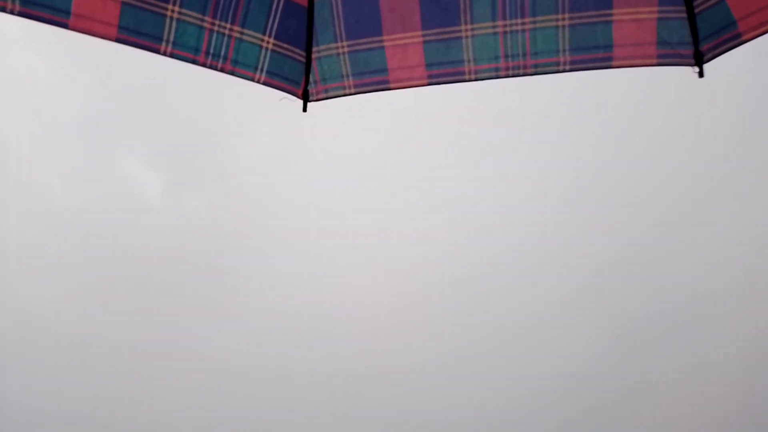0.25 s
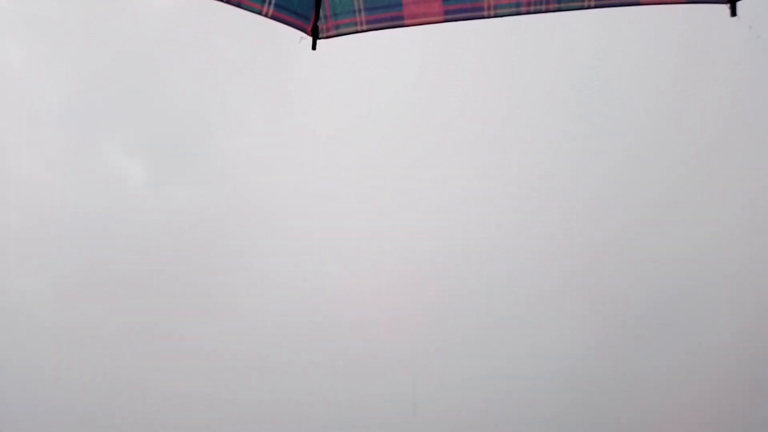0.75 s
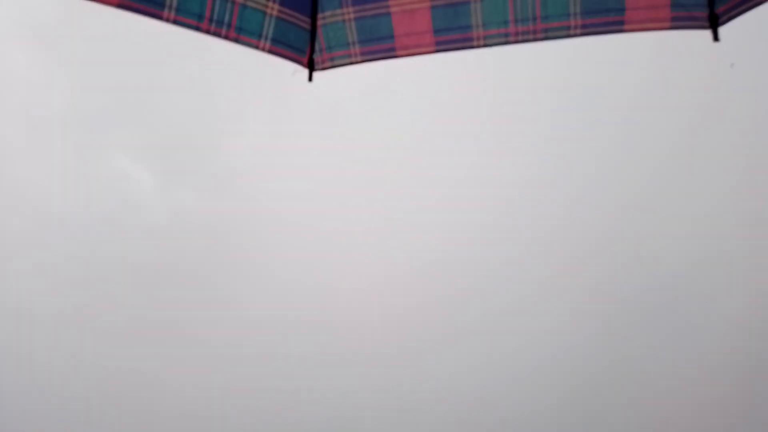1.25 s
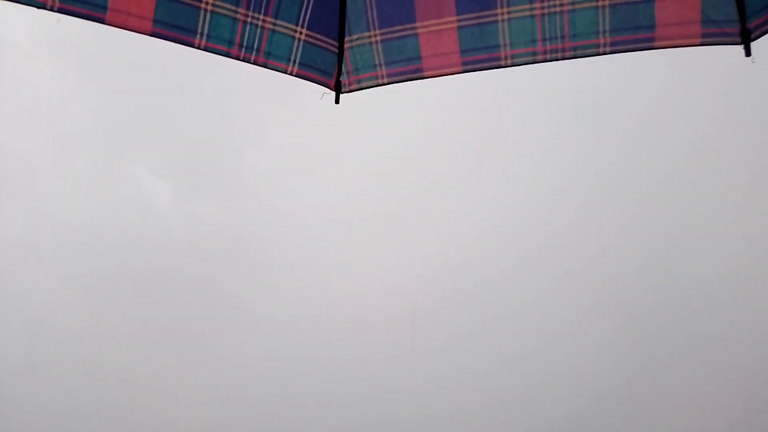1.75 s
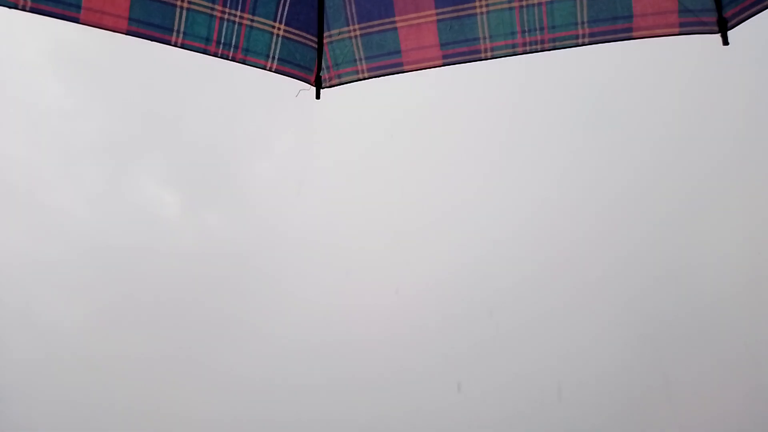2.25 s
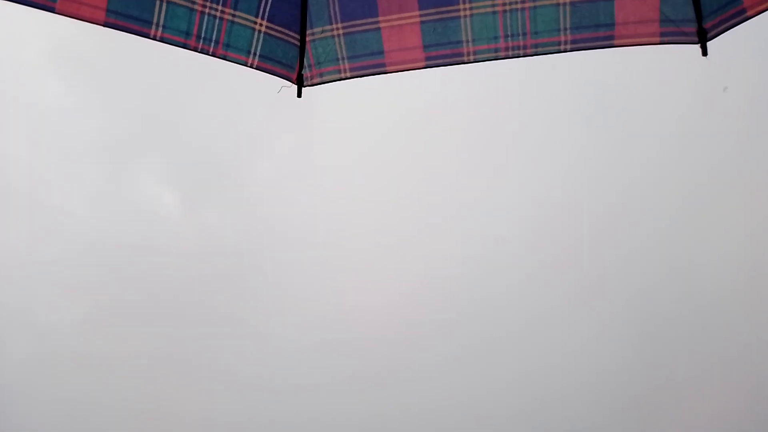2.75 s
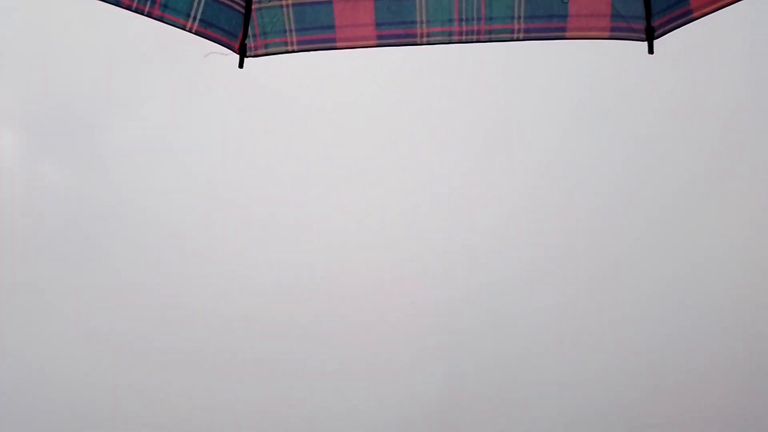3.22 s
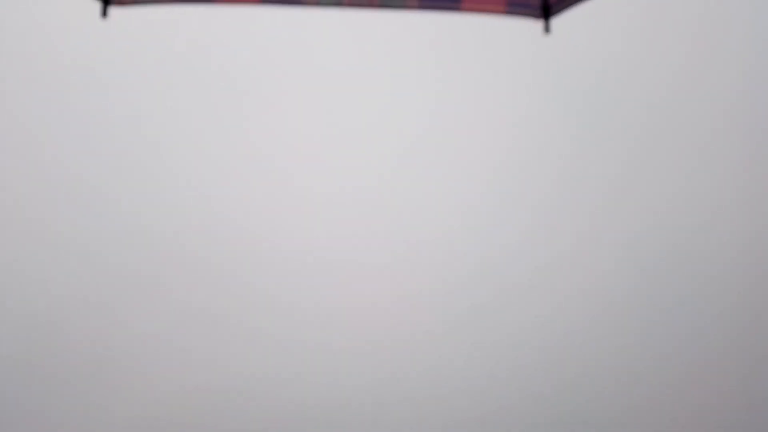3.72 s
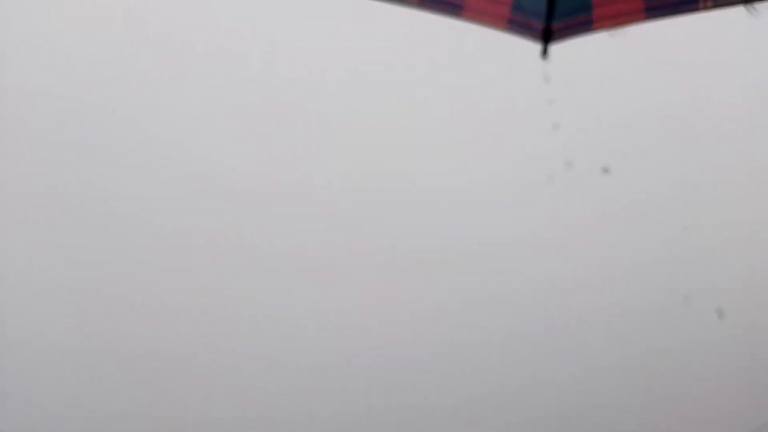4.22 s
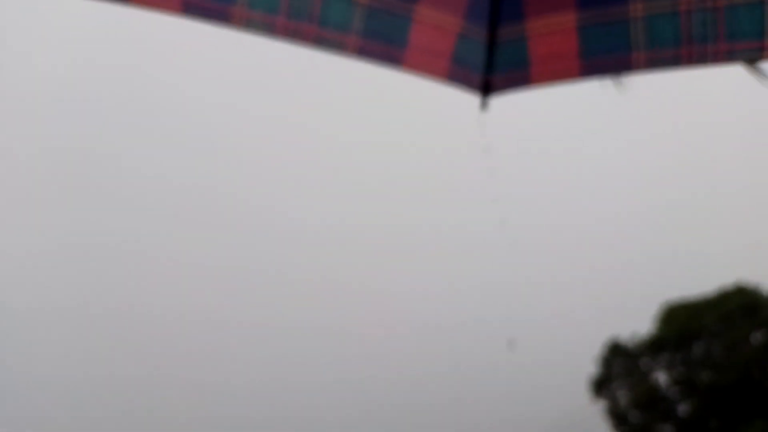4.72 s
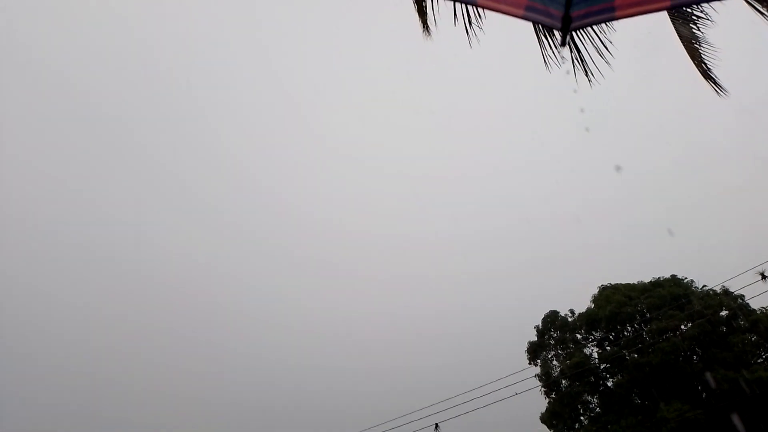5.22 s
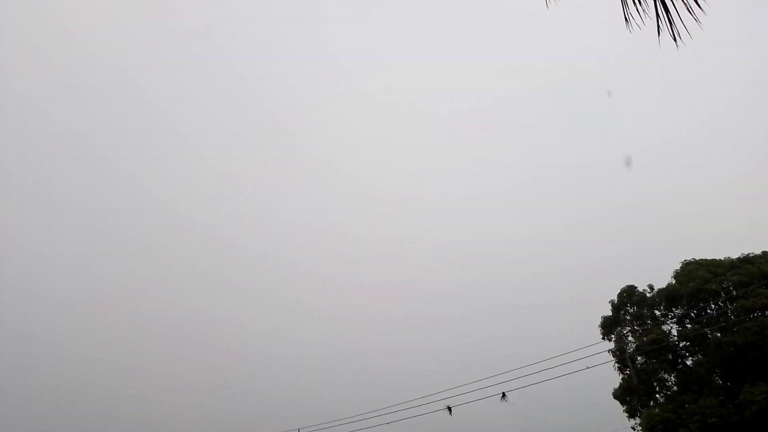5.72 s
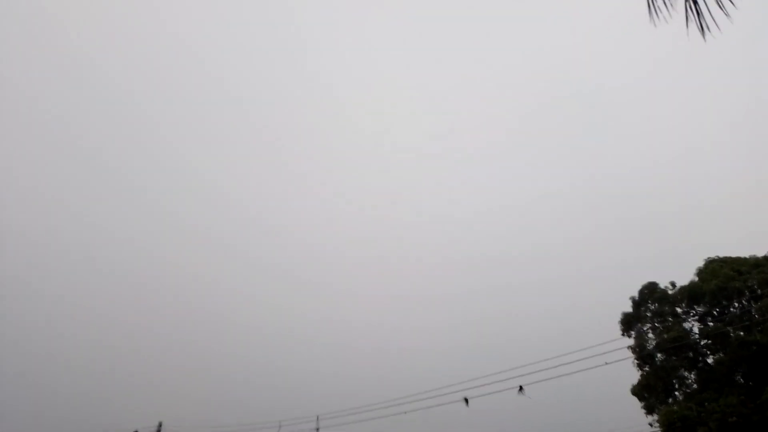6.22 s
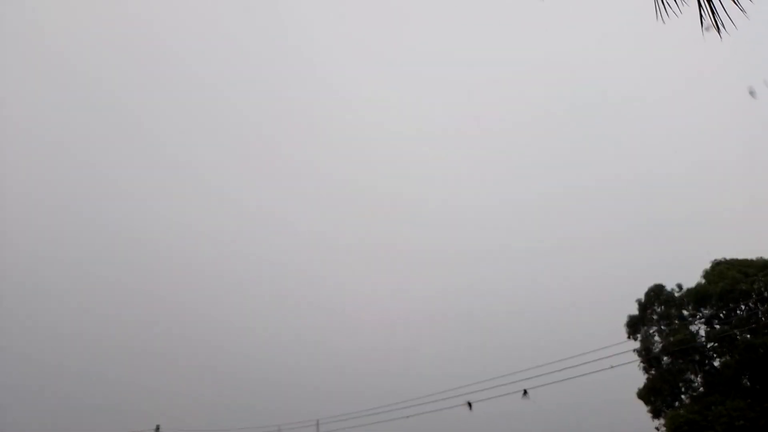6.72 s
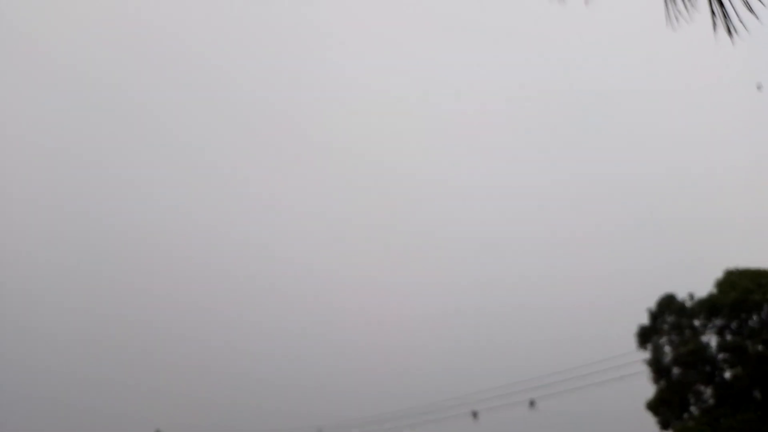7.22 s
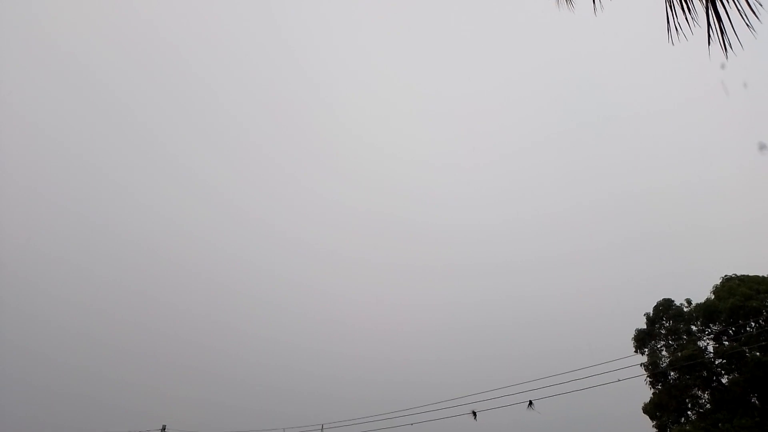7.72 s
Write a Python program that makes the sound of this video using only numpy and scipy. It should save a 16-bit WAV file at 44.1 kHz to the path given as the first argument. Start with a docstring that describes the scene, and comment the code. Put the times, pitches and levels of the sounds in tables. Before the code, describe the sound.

Under a cloth umbrella in open air, a continuous sizzling rain hiss surrounds quick patter and larger, low-pitched drop hits. A few sharp splashes snap close to the microphone. After a sparse early stretch the thumps grow thicker and stronger around three to four seconds, then continue in uneven bunches to the end. Close stereo phone sound, with bright, processed highs and only very faint wind rumble.

```python
"""Drops thump and crack on the taut cloth of an umbrella over a steady hiss: heavy rain around a two-microphone phone.
Each drop is a damped swing, a panel ring and a noise burst; near spray is random clicks, far rain is banded noise,
wind on the ports is low-band noise. The left port also has a hollow ring of varying strength.
Each port rings at its own high pitch and turns the hiss into two bright bands, whose edges the phone's
noise suppressor sharpens."""
import sys
import numpy as np
from scipy import signal
from scipy.io import wavfile
from scipy.ndimage import uniform_filter1d

SR = 44100
rng = np.random.default_rng(int(sys.argv[2]) if len(sys.argv) > 2 else 0)


def pcm_store(signal):
    """Save signal as 16-bit PCM."""
    levels = np.round(np.clip(np.atleast_2d(signal), -1, 1) * 32767)
    wavfile.write(sys.argv[1], SR, levels.astype(np.int16).T)


N = 351036

# big drops on the cloth: (time [s], dent level before pan [dB], panel pitch [Hz])
BIG_DROPS = [(0.0178, -18.5, 810), (0.0503, -17, 780), (0.162, -16, 714), (0.328, -21, 950),
             (0.3923, -19, 1000), (0.5147, -19, 700), (0.5315, -18, 1000), (0.573, -15.0, 980),
             (0.5883, -21, 1010), (1.2087, -25, 1010), (1.4034, -21, 880), (1.6801, -13.5, 550),
             (1.727, -18, 825), (1.8727, -14.0, 890), (1.8816, -11.5, 500), (2.0026, -20, 950),
             (2.0348, -14.5, 780), (2.2598, -20, 930), (2.3618, -16, 920), (2.3763, -16, 840),
             (2.4273, -15.5, 700), (2.5081, -17.0, 1110), (2.574, -20, 940), (2.6068, -12.5, 430),
             (2.6248, -10, 500), (2.8114, -16.5, 590), (2.8274, -15.5, 520), (2.8608, -15.5, 736),
             (2.8866, -16, 520), (2.9286, -13, 550), (2.9348, -16, 590), (2.9515, -13.0, 540),
             (2.9587, -12, 640), (2.9747, -19.0, 990), (2.9915, -16, 780), (3.005, -17.0, 540),
             (3.0112, -15, 720), (3.0406, -16, 750), (3.1573, -20, 680), (3.1723, -16, 680),
             (3.2075, -16, 674), (3.26, -15.0, 780), (3.3578, -14.5, 1070), (3.3973, -21, 1040),
             (3.4559, -15.0, 660), (3.47, -8.5, 764), (3.5216, -16, 567), (3.5316, -15.5, 590),
             (3.542, -16, 980), (3.6182, -15.5, 670), (3.6242, -19, 770), (3.6578, -16.0, 660),
             (3.708, -13, 450), (3.7691, -16, 710), (3.899, -11.5, 460), (3.9072, -15.0, 450),
             (3.9715, -10, 494), (4.0915, -14, 450), (4.1088, -7, 470), (4.1344, -16, 510),
             (4.1475, -20, 480), (4.2327, -14.5, 556), (4.257, -16.0, 560), (4.2816, -18, 940),
             (4.2891, -14, 590), (4.406, -15, 540), (4.4306, -15.0, 450), (4.4828, -13.0, 470),
             (4.536, -14.5, 600), (4.545, -14.5, 680), (4.5834, -18.5, 800), (4.6303, -14, 610),
             (4.684, -17.0, 670), (4.9059, -18.0, 510), (4.9575, -15.0, 720), (5.1315, -14.5, 480),
             (5.4356, -12, 670), (5.4711, -11.5, 940), (5.4822, -16, 595), (5.5183, -18.5, 990),
             (5.5624, -13, 930), (5.6846, -12.0, 505), (5.708, -17.5, 623), (5.8364, -19.5, 734),
             (5.897, -17.0, 670), (5.9521, -14.0, 470), (5.9933, -15, 600), (6.0304, -12.5, 650),
             (6.045, -14, 760), (6.0865, -19.0, 810), (6.1213, -15.5, 680), (6.2226, -18.5, 970),
             (6.3899, -16, 820), (6.4064, -17, 970), (6.4889, -17.0, 630), (6.5188, -18, 690),
             (6.5341, -14.0, 643), (6.5488, -15, 600), (6.5596, -14, 670), (6.7684, -13.0, 610),
             (6.8744, -18.5, 990), (6.8894, -19.0, 540), (6.945, -12.0, 655), (6.974, -16.0, 800),
             (7.0197, -12.5, 650), (7.1235, -24, 630), (7.1953, -13.0, 720), (7.203, -14, 540),
             (7.5004, -13, 800), (7.5147, -12.5, 736), (7.5289, -8.0, 620), (7.55, -18.0, 830),
             (7.581, -18, 660), (7.6218, -19.5, 520), (7.6575, -12.5, 750), (7.6735, -19, 600),
             (7.6999, -13, 830), (7.7546, -17, 570)]
SLAP_HZ, SLAP_DECAY_MS = 1034, 0.21
RING_RE_SLAP_DB, RING_DECAY_MS = -16, 2
BIG_CRACK_RE_DENT_DB = -5.5
CRACK_DECAY_MS, CRACK_BAND_HZ = 1, (1120, 5800)
LEFT_LAG_RANGE_MS = (-.1, .32)  # over the canopy; positive: left hears later

# patter on the cloth, moving between panels:
# (time [s], dent level of the smallest drops before pan [dB], centre panel pitch [Hz])
PATTER_COURSE = [(0, -25, 674), (1.2, -28, 665), (2.199, -26.5, 740), (2.9, -24.5, 527), (3.3, -28.5, 652),
                 (4.1, -27, 474), (4.6, -28, 704), (5.25, -28.5, 590), (5.55, -29, 843), (6.3, -28.5, 680),
                 (7.0, -27, 700), (7.6, -24, 776), (7.96, -34.5, 595)]
PATTER_PER_S, PATTER_SPREAD_DB, PATTER_MAX_OVER_SMALLEST_DB = 170, 1, 4
PANEL_SPREAD_OCT = 2  # full width
SMALL_CRACK_RE_DENT_DB, SMALL_CRACK_SPREAD_DB = -6.5, 1

# sharp splashes close to the phone: (time [s], starting noise level before pan [dB])
SPLASHES = [(0.1292, -15), (0.7467, -19), (3.2234, -19.5), (4.2563, -17), (5.24, -13), (5.9504, -18),
            (7.337, -18)]
SPLASH_DECAY_MS = 0.44

# near spray; its level passes from under-canopy to outside values as the phone turns out
SPATTER_PER_S, SPATTER_SPREAD_DB, SPATTER_LOW_CUT_HZ = 6000, 2, 2300
SPRAY_UNDER_DB, SPRAY_OUT_DB = (-30.5, -33.5), (-34, -35)  # left, right
TILT_FROM_S, TILT_TO_S = 3.205, 4.67

# far-rain spectrum: (frequency [Hz], relative density [dB per Hz])
FAR_SPECTRUM = [(150, 8), (300, -1), (600, 0), (1200, 3.5), (2200, 8), (4000, -0.5), (7000, -38),
                (14000, -9.5)]
# far-rain stereo: (frequency [Hz], left-right correlation [0 to 1])
FAR_LIKENESS = [(200, .85), (500, .5), (1100, 0)]
FAR_HISS_DB = -37  # before pan
CANOPY_PAN_DB = 1.8  # cloth and far rain: right up, left down

# wind on the ports, in lumps: (time [s], rumble level [dB])
WIND_COURSE = [(0, -67), (2.1, -67.5), (2.24, -54), (2.55, -74), (3.15, -67), (3.25, -60), (3.7, -76),
               (3.9, -62), (4.2, -70.5), (5.8, -63), (6.1, -75.5), (6.25, -64), (7.96, -65.5)]
RUMBLE_BAND_HZ = (34, 145)

# level of the left port's hollow resonances over time: (time [s], gain [dB])
HOLLOW_COURSE = [(0, -4.5), (1.1, -8), (1.6, -9), (1.9, -4.5), (2.7, -6.5), (3.2, -7.5), (3.7, -9.5),
                 (4.5, -9.5), (5.2, -12), (5.55, -9), (6.3, -12), (6.7, -11.5), (7.3, -14), (7.7, -8)]
HOLLOW_HZ, HOLLOW_WIDTH_HZ, HOLLOW_LOW_CUT_HZ = 1730, 390, 440
SECOND_HOLLOW_HZ, SECOND_HOLLOW_WIDTH_HZ, SECOND_HOLLOW_DB = 1356, 326, -7.5
LOW_CUT_HZ, STEEP_LOW_CUT_HZ = (204, 263), 235  # left, right; both

# port cavities, left then right: (resonance [Hz], width [Hz], mesh cutoff before a 21 kHz cap [Hz])
PORT_CAVITIES = [(7353, 950, 21800), (10490, 980, 11390)]

# suppressor threshold: (frequency [Hz], density [dB per Hz])
GATE_THRESHOLD = [(400, -76.5), (800, -75), (1300, -72), (1800, -68.5), (2400, -69.5), (7000, -68),
                  (9000, -67), (12000, -68)]
GATE_DEPTH_DB, GATE_KNEE_DB, GATE_MEMORY_MS = 9.5, .8, 210
TOP_CUT_HZ = 14250


def amp(db):
    """dB to gain."""
    return 10 ** (np.asarray(db) / 20)


def rms_one(x):
    """Scale to rms 1."""
    return x / np.sqrt(np.mean(x ** 2) + 1e-20)


def at_hz(points, hz):
    """Read a spectrum on a log-frequency axis."""
    table_hz, values = np.transpose(points)
    return np.interp(np.log(hz), np.log(table_hz), values)


def over_time(times_s, values):
    """Straight-line course, one value per sample."""
    return np.interp(np.arange(N) / SR, times_s, values)


def drift(rate_hz):
    """Slow random course of rms 1: twice-smoothed noise at 1/20 the sample rate."""
    r = np.exp(-40 * np.pi * rate_hz / SR)
    noise = rng.standard_normal(N // 20 + 4002)
    slow = signal.lfilter([1], [1, -2 * r, r * r], noise)[4000:]  # drop the run-in
    return np.interp(np.arange(N) / 20, np.arange(len(slow)), rms_one(slow))


def butter(x, hz, kind, order):
    """Causal Butterworth filter."""
    return signal.sosfilt(signal.butter(order, hz, kind, fs=SR, output="sos"), x)


def resonate(x, hz, width_hz):
    """Two-pole resonator: unity gain at 0 Hz, a peak, falling above."""
    r = np.exp(-np.pi * width_hz / SR)
    poles = [1, -2 * r * np.cos(2 * np.pi * hz / SR), r * r]
    return signal.lfilter([sum(poles)], poles, x)


def place(shapes, start_s):
    """Sum one short shape per start time."""
    length = shapes.shape[1]
    out = np.zeros(N + 2 * length)
    first = np.clip(np.round(start_s * SR).astype(int), 0, N)
    np.add.at(out, first[:, None] + np.arange(length), shapes)
    return out[:N]


def burst(count, decay_ms):
    """Puffs of exponentially decaying noise."""
    t = np.arange(200) / SR
    return rng.standard_normal((count, 200)) * np.exp(-t / (decay_ms / 1000))


def damped_sine(t, hz, decay_ms):
    """Sine with exponential decay."""
    return np.sin(2 * np.pi * hz * t) * np.exp(-t / (decay_ms / 1000))


def drops(time_s, dent_db, panel_hz, crack_re_dent_db):
    """Each drop dents the cloth, rings its panel and bursts; the ports hear it a moment apart."""
    t = np.arange(900) / SR
    slap = damped_sine(t, SLAP_HZ, SLAP_DECAY_MS)
    ring = amp(RING_RE_SLAP_DB) * damped_sine(t, panel_hz[:, None], RING_DECAY_MS)
    thump = -amp(dent_db)[:, None] * (slap + ring)
    start_s = time_s - 1 / (4 * SLAP_HZ)  # a quarter swing early
    lag_ms = rng.uniform(*LEFT_LAG_RANGE_MS, len(time_s))
    channels = []
    for side in (1, -1):  # left, right
        heard_s = start_s + side * lag_ms / 2000  # half the lag each way
        puffs = amp(dent_db + crack_re_dent_db)[:, None] * burst(len(time_s), CRACK_DECAY_MS)
        crack = butter(place(puffs, heard_s), CRACK_BAND_HZ, "band", order=2)
        channels.append(place(thump, heard_s) + crack)
    return np.array(channels)


def patter():
    """Smaller drops at random times on random panels, many faint and few strong."""
    draw = rng.random((round(PATTER_PER_S * N / SR), 3))
    time_s = draw[:, 0] * N / SR
    over_smallest_db = np.minimum(-PATTER_SPREAD_DB * np.log(draw[:, 1]), PATTER_MAX_OVER_SMALLEST_DB)
    course_s, smallest_db, centre_hz = np.transpose(PATTER_COURSE)
    panel_hz = np.interp(time_s, course_s, centre_hz) * 2 ** (PANEL_SPREAD_OCT * (draw[:, 2] - .5))
    dent_db = np.interp(time_s, course_s, smallest_db) + over_smallest_db
    crack_db = rng.normal(SMALL_CRACK_RE_DENT_DB, SMALL_CRACK_SPREAD_DB, len(time_s))
    return drops(time_s, dent_db, panel_hz, crack_db)


def splashes():
    """Splashes close to the phone: only a crack, independent noise at each port."""
    time_s, level_db = np.transpose(SPLASHES)
    return np.array([place(amp(level_db)[:, None] * burst(len(time_s), SPLASH_DECAY_MS), time_s)
                     for _ in range(2)])


def near_spray():
    """Tiny droplets: clicks of random size and sign, unrelated at the two ports."""
    born = rng.random((2, N)) < SPATTER_PER_S / SR
    size_db = SPATTER_SPREAD_DB * np.minimum(rng.exponential(1, (2, N)), 5)
    clicks = born * amp(size_db) * rng.choice([-1, 1], (2, N))
    spray = rms_one(butter(clicks, SPATTER_LOW_CUT_HZ, "high", order=2)) * amp(0.79 * drift(22.0))
    level_db = [over_time([TILT_FROM_S, TILT_TO_S], ends) for ends in zip(SPRAY_UNDER_DB, SPRAY_OUT_DB)]
    return amp(np.array(level_db)) * spray


def far_rain(flicker_db, swell_db):
    """Half-octave bands of stereo noise; all swell together as drops clump, each also flickers alone."""
    edges_hz = 140 * 2 ** np.arange(0, 7.1, .5)
    clumps_db = swell_db * (drift(16.0) + drift(34))
    white = rng.standard_normal((2, 2, N))  # neighbouring bands use different noise
    out = 0
    for k, (low_hz, high_hz) in enumerate(zip(edges_hz, edges_hz[1:])):
        mid, side = butter(white[k % 2], [low_hz, high_hz], "band", order=2)
        centre_hz = np.sqrt(low_hz * high_hz)
        alike = np.clip(at_hz(FAR_LIKENESS, centre_hz), 0, 1)
        gain = amp(at_hz(FAR_SPECTRUM, centre_hz) + flicker_db * drift(13.0))
        out = out + gain * (np.sqrt(1 + alike) * mid + np.sqrt(1 - alike) * side * [[1], [-1]])
    return amp(FAR_HISS_DB) * rms_one(out) * amp(clumps_db)


def wind_rumble():
    """Wind on the ports: low-band noise, part common and part separate, fluctuating and in lumps."""
    rumble = butter(rng.standard_normal((3, N)), RUMBLE_BAND_HZ, "band", order=3)
    rumble = rumble * amp(3.0 * drift(9.2))
    stereo = 1.3 * rumble[0] + rumble[1:] * amp([[1.5], [-1.5]])  # separate part: left +1.5 dB, right -1.5 dB
    return amp(over_time(*np.transpose(WIND_COURSE))) * rms_one(stereo)


def left_hollow(left):
    """Two resonances, the second weaker, add a hollow ring of varying strength to the left port."""
    fed = butter(left, HOLLOW_LOW_CUT_HZ, "high", order=1)
    main = resonate(fed, HOLLOW_HZ, HOLLOW_WIDTH_HZ)
    second = amp(SECOND_HOLLOW_DB) * resonate(fed, SECOND_HOLLOW_HZ, SECOND_HOLLOW_WIDTH_HZ)
    return left + amp(over_time(*np.transpose(HOLLOW_COURSE))) * (main + second)


def ports(x):
    """Air behind each port rings; a mesh dulls the top."""
    return np.array([butter(resonate(channel, hz, width_hz), min(mesh_hz, 21000), "low", order=2)
                     for channel, (hz, width_hz, mesh_hz) in zip(x, PORT_CAVITIES)])


def suppress(x):
    """Noise suppressor: each bin falls further where its recent power lies under the threshold."""
    hz, _, spectrum = signal.stft(x, SR, nperseg=1024, noverlap=768, scaling="psd")
    keep = np.exp(-256 / SR / (GATE_MEMORY_MS / 1000))  # per 256-sample hop
    power = uniform_filter1d(np.abs(spectrum) ** 2, size=3, axis=1)  # over neighbouring bins
    initial = keep * power[..., :20].mean(2, keepdims=True)
    recent = signal.lfilter([1 - keep], [1, -keep], power, axis=2, zi=initial)[0]
    over_db = 10 * np.log10(recent + 1e-20) - at_hz(GATE_THRESHOLD, hz + 1)[:, None]
    # -DEPTH/2 well above threshold, -3*DEPTH/2 well below
    gain_db = -GATE_DEPTH_DB / 2 * (2 - np.tanh(over_db / GATE_KNEE_DB))
    return signal.istft(spectrum * amp(gain_db), SR, nperseg=1024, noverlap=768, scaling="psd")[1][:, :N]


def scene():
    """Cloth, near spray, far rain and wind rumble."""
    cloth = drops(*np.transpose(BIG_DROPS), BIG_CRACK_RE_DENT_DB) + patter() + splashes()
    canopy = cloth + far_rain(flicker_db=2.36, swell_db=1.0)
    rain = amp([[-CANOPY_PAN_DB], [CANOPY_PAN_DB]]) * canopy + near_spray()
    rain[0] = left_hollow(rain[0])
    rain = np.array([butter(channel, hz, "high", order=3) for channel, hz in zip(rain, LOW_CUT_HZ)])
    rain = butter(rain, STEEP_LOW_CUT_HZ, "high", order=4)
    return rain + wind_rumble()


def record(dry):
    """The ports ring, the suppressor thins the quiet bands, the top is cut."""
    top_cut = signal.ellip(12, .5, 60, TOP_CUT_HZ, fs=SR, output="sos")
    return signal.sosfilt(top_cut, suppress(ports(dry)))


dry = scene()
out = record(dry)
pcm_store(out)
```